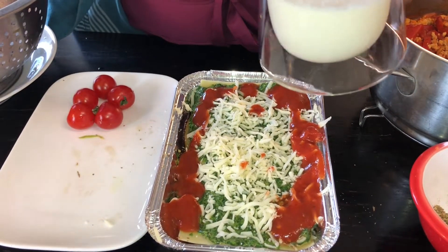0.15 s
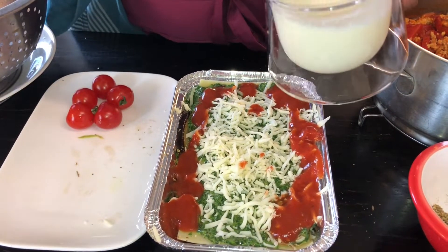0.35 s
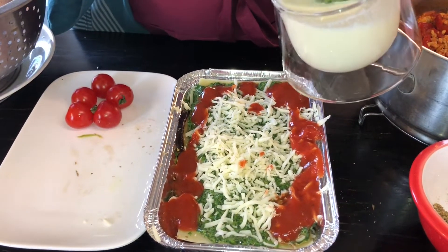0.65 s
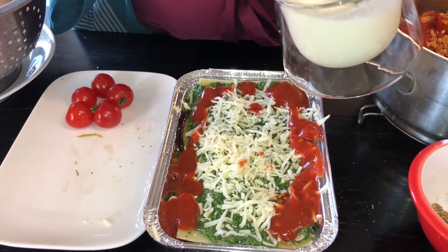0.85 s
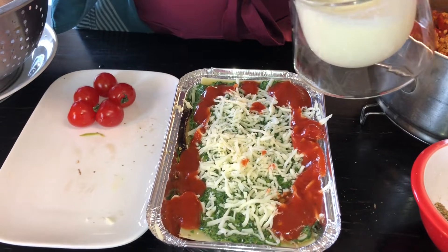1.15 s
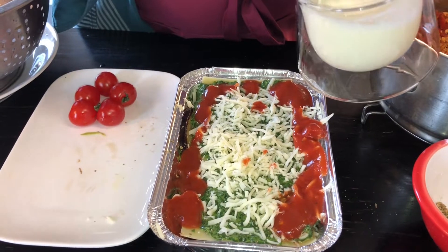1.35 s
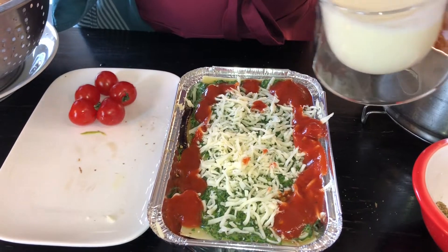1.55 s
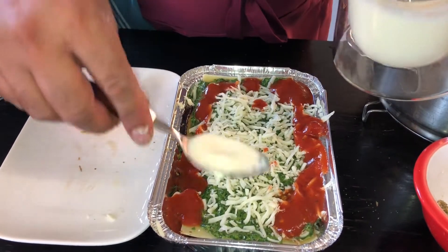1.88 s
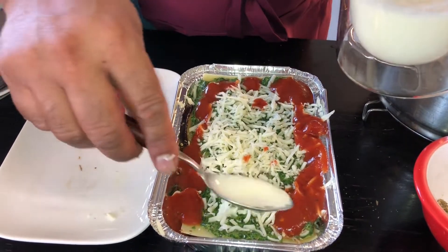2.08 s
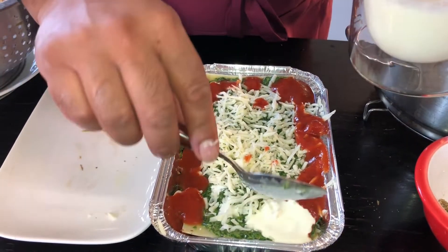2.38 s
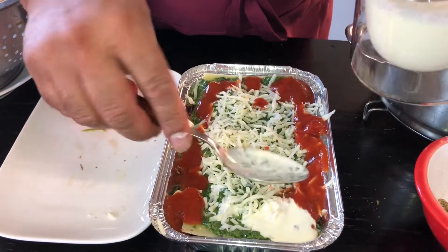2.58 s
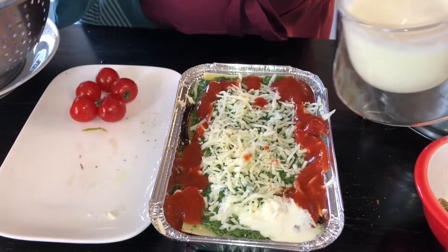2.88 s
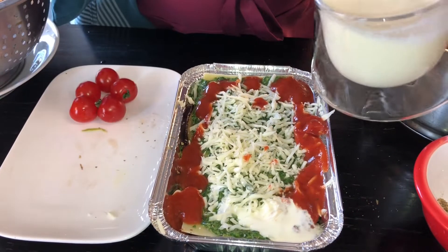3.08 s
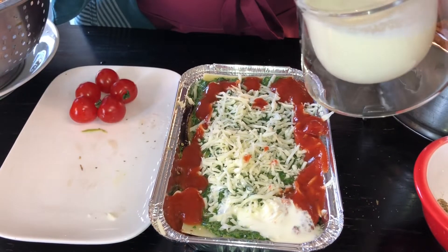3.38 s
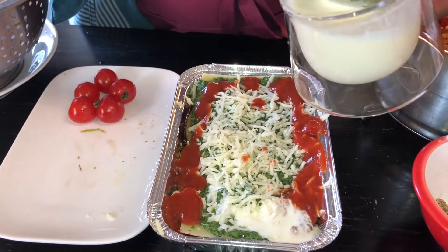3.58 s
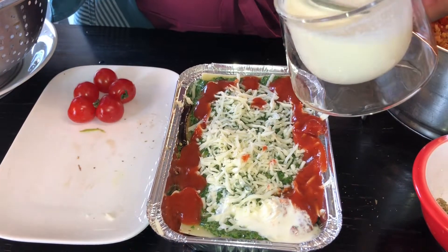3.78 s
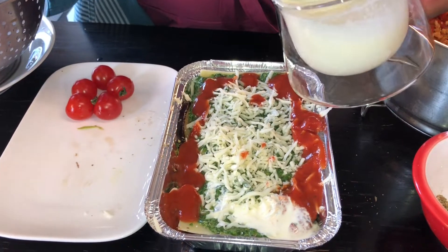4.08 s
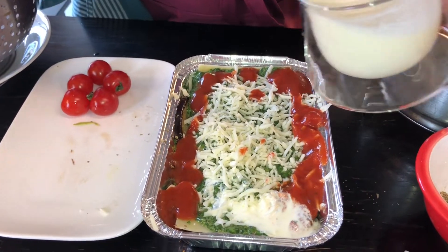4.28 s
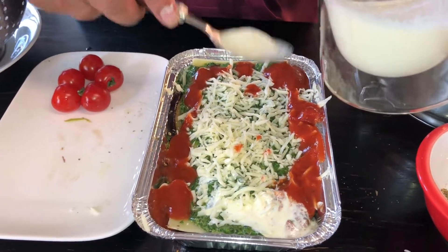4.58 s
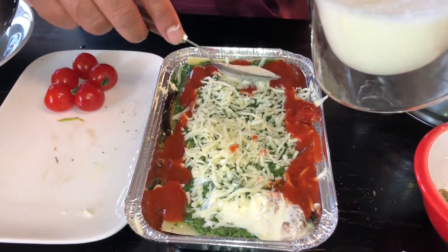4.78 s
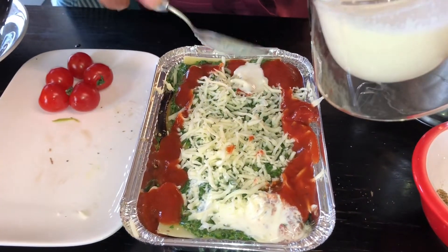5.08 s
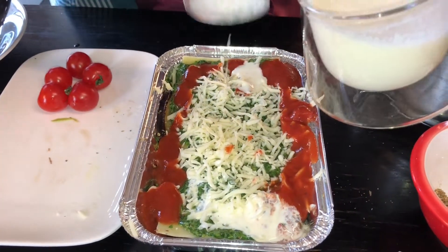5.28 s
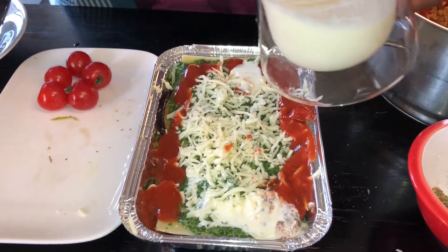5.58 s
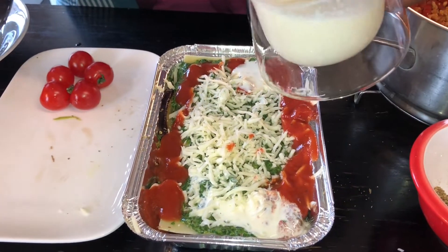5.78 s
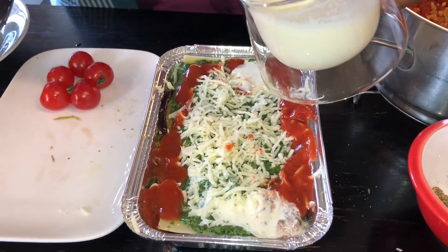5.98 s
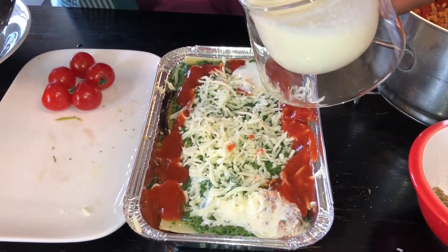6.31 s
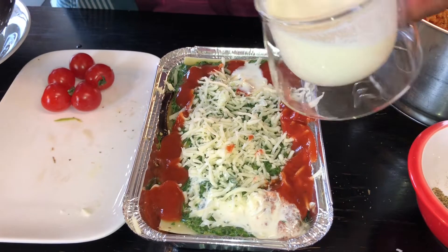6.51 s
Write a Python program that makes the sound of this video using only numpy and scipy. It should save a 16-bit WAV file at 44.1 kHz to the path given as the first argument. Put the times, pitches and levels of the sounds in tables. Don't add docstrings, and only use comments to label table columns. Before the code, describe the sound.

Sharp metal-on-glass clinks, a double tap and then a rapid rattle, with faint cloth rustle and a distant bird whistle in a quiet kitchen.

```python
import sys
import numpy as np
from scipy import signal
from scipy.fft import rfft, irfft
from scipy.io import wavfile
from scipy.ndimage import map_coordinates

SR = 44100
rng = np.random.default_rng(int(sys.argv[2]) if len(sys.argv) > 2 else 0)


def transcribe(u):
    v = np.clip(np.atleast_2d(u).T, -1, 1)
    q = np.round(v * 32767).astype(np.int16)
    wavfile.write(sys.argv[1], SR, q)


def boost(x):
    u = np.asarray(x, float) / 20
    return 10 ** u


N = 293265

# time to fall 60 dB in seconds, share sent to the walls in dB.
SPOON_BENDS = [(0.068, -17.5), (.06, -17), (0.026, -20)]


def clinks():
    # start in seconds, blow in dB, contact point along the spoon (0-1),
    # first and second rim mode of the bowl in dB.
    blows = [
        (0.8997, -3.5, .48, -23.5, -41.5),
        (0.963, 1, .7, -21.5, -45.5),
        (3.7018, 4, 0.53, -13.5, -28),
        (3.7991, 1, .72, -15, -32.5),
        (3.8389, -1.5, 0.14, -31, -19.5),
        (3.9333, -2, .8, -20.5, -29.5),
        (3.9685, -8, .33, -24, -30.5),
        (4.4105, -6, 0.46, -32.5, -33.5),
        (6.0858, -3.5, 0.0045, -24, -28.5),
    ]
    # from in seconds, third bending mode in Hz, its lean against the second in dB,
    # third rim mode in dB over the blow, seconds until the sauce chokes the lowest rim mode.
    dips = [
        (0, 3518, -1.5, -30, 0.48),
        (3.6, 3575, 2.2, -32, 0.38),
        (4.3, 3610, -3, -27, 0.52),
        (6, 3560, -2.5, -27.5, 0.4),
    ]
    # node along the spoon (0-1), spoon lengths to the next node,
    # level halfway between in dB over the blow.
    nodes = [(1.25, 3, -1.5), (0.19, 3.3, 6), (0.12, 0.89, 4.5)]
    bend_pair_hz = [1508, 2958]
    shine_db = [-0.5, -0.5, -4]
    full_span = (4.2, 4.6)
    held_t60, free_t60 = 0.38, 0.64
    linger_s = 0.15
    bowl_wet_db, snap_lead_s = -20, 0.0004

    out, t = np.zeros(N), np.arange(SR * 2 // 3) / SR
    rests = np.diff([row[0] for row in blows], append=N / SR)
    for (s, blow_db, place, first_db, second_db), rest in zip(blows, rests):
        _, third_hz, lean_db, third_rim_db, choke_s = [dip for dip in dips if dip[0] < s][-1]
        full = full_span[0] < s < full_span[1]

        bend_dbs = np.array([blow_db + db + 20 * np.log10(abs(np.sin(np.pi * (place - node) / span)) + 0.001)
                             for node, span, db in nodes])
        bend_dbs = bend_dbs - 24.5 * full + lean_db * np.array([0, -1, 1])
        pitch = 0.87 if full else 1 + 0.08 * abs(place) ** 6
        bend_hz = pitch * np.array([*bend_pair_hz, third_hz])

        tip_db = 4.5 * (0.5 - place)
        shine = np.add(shine_db, np.multiply(full, [4.5, -1, 4])) + [tip_db, 0, 0]
        thud_db = blow_db - 27.5 - 6 * full
        sent_db = 2.2 + 7 * full

        t60, choke_s = (held_t60, 1) if rest < linger_s else (free_t60, choke_s)
        glass = bowl(t, [first_db, second_db, blow_db + third_rim_db], t60, choke_s, rest)
        knock = ring(t, 500, thud_db - 1.5, 0.03)
        steel, sent = spoon(t, blow_db, bend_dbs, bend_hz, shine, thud_db, sent_db)
        snap = place * ring(t, 11620, blow_db + 2, 0.0045)
        add(out, s - snap_lead_s, snap)
        add(out, s, glass + steel + knock)
        add(out, s, kitchen(boost(bowl_wet_db) * glass + sent))
    return out


def bowl(t, rim_dbs, lowest_t60, choke_s, rest):
    rim_hz = [1287, 2731, 4508, 6690, 9100]
    rim_t60 = [0.38, 0.21]
    # level against the third in dB, time to fall 60 dB in seconds.
    upper_rim = [(-7, 0.14), (-7, .15)]
    first_db, *dbs = rim_dbs
    choked_db = first_db + 1.2 * wobble(25)[:len(t)] - 60 * (t / choke_s) ** 5
    lowest = ring(t, rim_hz[0], choked_db, lowest_t60, attack=0.002)
    rim = sum(ring(t, hz, db + 1.2 * wobble(25)[:len(t)], t60)
              for hz, t60, db in zip(rim_hz[1:], rim_t60, dbs))
    upper = sum(ring(t, hz, dbs[-1] + db, t60) for hz, (db, t60) in zip(rim_hz[-2:], upper_rim))
    damping = boost(-60 * np.maximum(t - rest, 0) / 0.071)
    return (lowest + rim + upper) * damping


def spoon(t, blow_db, bend_dbs, bend_hz, shine, thud_db, sent_db):
    tinkle_hz = [2015, 2385, 3780, 3980, 4185, 4520, 5350, 5510, 5760, 6240, 6670, 7180, 8940, 9450, 9900,
                 10350, 11190, 11850]
    tinkle_db = [-23.5, -25.5, -19, -20, -17.5, -13.5, -20, -18.5, -16, -11.5, -12.5, -18.5, -16.5, -16,
                 -13.5, -20, -20, -18.5]
    # frequency in Hz, level in dB.
    crack_colour = [(60, -31), (400, -20.5), (1000, -11), (2000, -6), (4200, 0.5), (7500, -8.5),
                    (8350, -19.5), (9300, -2), (12000, -5), (16000, -13)]
    tinkle_t60 = 0.032
    crack_wet_db, tinkle_wet_db = -12, -2.5

    low_db, mid_db, high_db = shine
    colour = [(2500, 0), (4300, low_db), (6000, mid_db), (7600, mid_db), (8800, high_db)]
    bends = [ring(t, hz, db, t60, attack=0.00032)
             for hz, (t60, _), db in zip(bend_hz, SPOON_BENDS, bend_dbs)]
    tinkle = 0
    for hz, db in zip(tinkle_hz, tinkle_db):
        level_db = blow_db + along(colour, hz) + db + rng.normal(0, 1.1)
        tinkle = tinkle + ring(t, hz * (1 + 0.0052 * rng.normal()), level_db, tinkle_t60)
    grit = boost(-7.5 - 60 * t / 0.0046) + boost(-9.5 - 60 * t / 0.03)
    scrape = noise(lambda f: boost(along(crack_colour, f) + along(colour, f)), size=len(t))
    crack = boost(blow_db) * grit * scrape
    thud = boost(thud_db) * np.e * t / 0.0007 * np.exp(-t / 0.00008)
    sent = sum(boost(share_db + sent_db) * bend for (_, share_db), bend in zip(SPOON_BENDS, bends))
    sent = sent + boost(crack_wet_db) * (boost(tinkle_wet_db) * tinkle + crack)
    return sum(bends) + tinkle + crack + thud, sent


def kitchen(sound):
    # frequency in Hz, time to fall 60 dB in seconds.
    room_t60 = [(200, .3), (1500, .38), (4500, .4), (6500, .33), (9500, .26), (12000, .17), (15000, .12)]
    hz, t, z = signal.stft(rng.standard_normal(SR * 2 // 3), SR, nperseg=256)
    fade = boost(-60 * t / along(room_t60, hz)[:, None])
    tail = signal.istft(z * fade, SR, nperseg=256)[1]
    tail = tail * np.clip(np.arange(len(tail)) / SR / 0.0088, 0, 1)
    return signal.fftconvolve(sound, tail / np.linalg.norm(tail))


def slide():
    # centre in seconds, length in seconds, level in dB.
    drags = [(3.026, 0.034, -59.5), (3.133, .06, -65), (3.3, .03, -65)]
    # frequency in Hz, width in Hz, level in dB.
    drag_tones = [(3900, 140, -1.5), (6080, 100, 1), (7030, 150, 3), (7700, 70, 1), (9700, 100, 0),
                  (10900, 120, -1)]
    tones = noise(lambda f: sum(boost(db) / (1 + ((f - hz) / w) ** 2) for hz, w, db in drag_tones))
    return strokes(drags) * unit(boost(3 * wobble(60)) * tones)


def ticks(wet_db=-14):
    # start in seconds, peak in dB, centre in Hz, length in seconds, width as a log ratio.
    drips = [(0.881, -51.5, 2930, 0.021, 0.093), (1.731, -54.5, 12500, 0.0044, .3),
             (3.486, -53.5, 8560, 0.0069, .4), (3.487, -57.5, 3150, 0.013, 0.034),
             (3.679, -45.5, 3230, 0.039, 0.2), (3.677, -47.5, 11000, 0.0068, 0.65),
             (4.023, -30.5, 2400, 0.02, 0.5), (4.648, -39, 10400, 0.00495, 0.22),
             (4.651, -46, 4712, .008, 1), (4.713, -45, 12390, 0.0052, 0.32),
             (4.716, -48.5, 4500, 0.00607, .7), (4.722, -47.5, 5840, 0.00681, .2),
             (4.809, -49, 10700, 0.0041, .12), (6.058, -62, 5000, 0.016, 0.4),
             (6.34, -58, 13980, 0.031, .15)]
    out, t = np.zeros(N), np.arange(SR // 10) / SR
    for s, db, hz, length, width in drips:
        band = noise(lambda f: np.exp(-(np.log((f + 1) / hz) / width) ** 2), size=len(t))
        burst = boost(db - 20 * t / length) * band
        add(out, s, burst)
        add(out, s, boost(wet_db) * kitchen(burst))
    return out


def sleeve():
    # centre in seconds, length in seconds, level in dB.
    brushes = [(-0.004, 0.2, -52.5), (0.551, .25, -61.5), (2.56, 0.012, -66.5), (2.897, 0.0875, -72),
               (3.041, .05, -58), (3.104, .03, -60), (3.199, 0.058, -61.5), (3.288, 0.046, -63),
               (5.093, 0.035, -60), (5.352, 0.034, -73), (5.535, 0.045, -68)]
    # frequency in Hz, density in dB per Hz.
    cloth_colour = [(300, 3.5), (1500, 9), (4000, 0.5), (5200, 2), (6300, 0), (6900, 3.5), (7500, -3),
                    (8300, -3), (10500, 0), (12500, -10), (15500, -5)]
    hiss = noise(lambda f: boost(along(cloth_colour, f)))
    return strokes(brushes) * unit(boost(2.1 * wobble(21)) * hiss)


def bird(wet_db=-6):
    # time in seconds, pitch in Hz, level in dB.
    whistle = [
        [(3.05, 2017, -70), (3.088, 2072, -65), (3.132, 1677, -52.5), (3.166, 1559, -56), (3.29, 1531, -58.5),
         (3.332, 1612, -53.5), (3.366, 1783, -59.5), (3.378, 1698, -67)],
        [(3.372, 1800, -71), (3.38, 2015, -55.5), (3.44, 2240, -58.5), (3.46, 2298, -76), (3.494, 2345, -55.5),
         (3.626, 2344, -69.5), (3.64, 2390, -76.5)],
    ]
    t, song = np.arange(N) / SR, np.zeros(N)
    for s, hz, db in map(np.transpose, whistle):
        on = np.clip(np.minimum((t - s[0]) / 0.012, (s[-1] - t) / 0.02), 0, 1)
        level = boost(np.interp(t, s, db) + 0.5 + 1.8 * wobble(47))
        phase = 2 * np.pi * np.cumsum(np.interp(t, s, hz)) / SR
        song += on * level * np.sin(phase)
    return song + boost(wet_db) * kitchen(song)[:N]


def room_tone():
    # frequency in Hz, density in dB per Hz.
    air_colour = [(12, -57.5), (20, -28), (48, -8), (93, -7.5), (123, -6), (167, -1), (198, -7),
                  (234, -2.5), (696, -9), (895, -4.5), (1000, -10.5), (1560, -18), (2130, -22), (2740, -25),
                  (15900, -33.5)]
    # frequency in Hz, width in Hz, rms level in dB.
    fridge_lines = [(100, 22, -64.5), (171, 26, -61.5), (307, 4, -70), (877, 29, -69)]
    low = noise(lambda f: boost(along(air_colour, f)) / (1 + (f / 1200) ** 2))
    low = low * boost(-2.0 + 0.41 * wobble(1.9) + 1.1 * wobble(5.3))
    high = noise(lambda f: boost(along(air_colour, f)) / (1 + (1200 / (f + 1)) ** 2))
    high = high * boost(-6 + 0.7 * wobble(12))
    lines = sum(boost(db + 0.5 * wobble(1.4)) * noise(lambda f: 1 / (1 + ((f - hz) / w) ** 2))
                for hz, w, db in fridge_lines)
    return boost(-53.5) * (low + high) + lines


def unit(x):
    return x / np.sqrt(np.mean(x ** 2) + 1e-20)


def along(points, hz):
    f, v = np.transpose(points)
    return np.interp(np.log(hz + 1), np.log(f + 1), v)


def noise(gain, size=N):
    spectrum = rfft(rng.standard_normal(size)) * gain(np.fft.rfftfreq(size, 1 / SR))
    return unit(irfft(spectrum, size))


def wobble(rate):
    knots = rng.standard_normal(int(N * rate / SR) + 4)
    return map_coordinates(knots, [np.arange(N) * rate / SR])


def strokes(rows):
    t = np.arange(N) / SR
    return sum(boost(db) * np.exp(-((t - s) / length) ** 2) for s, length, db in rows)


def ring(t, hz, db, t60, attack=0.00018):
    return boost(db - 60 * t / t60) * (1 - np.exp(-t / attack)) * np.sin(2 * np.pi * hz * t)


def add(track, s, sound):
    part = track[round(s * SR):][:len(sound)]
    part += sound[:len(part)]


def scene():
    return (clinks() + slide() + ticks() + sleeve() + bird() + room_tone())[None]


def roll_off(x):
    return signal.sosfilt(signal.butter(12, 16070, fs=SR, output="sos"), x)


def record(dry):
    clipped = dry / (1 + np.abs(dry / 0.99) ** 12) ** (1 / 12)
    return roll_off(clipped)


dry = scene()
out = record(dry)
transcribe(out)
```